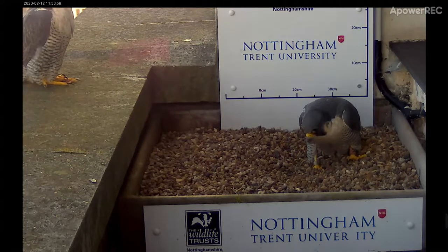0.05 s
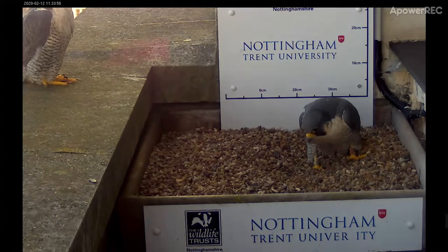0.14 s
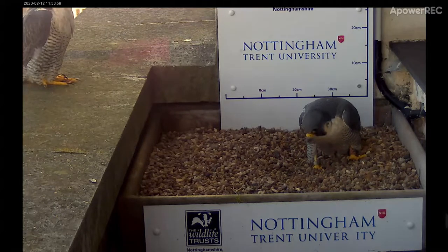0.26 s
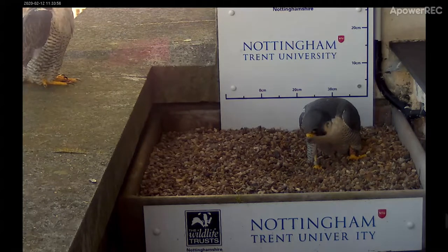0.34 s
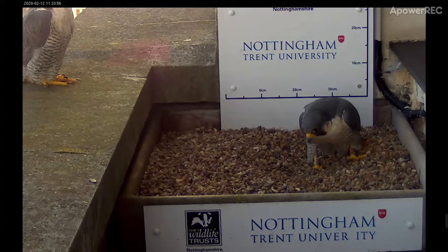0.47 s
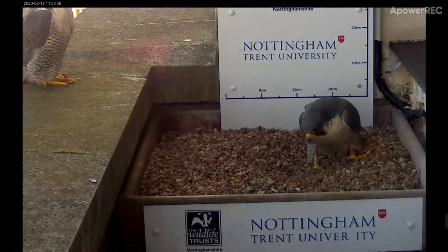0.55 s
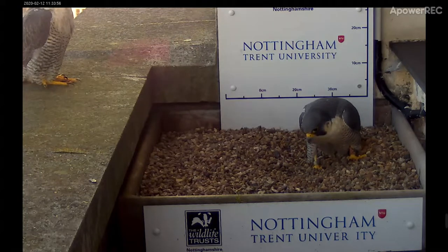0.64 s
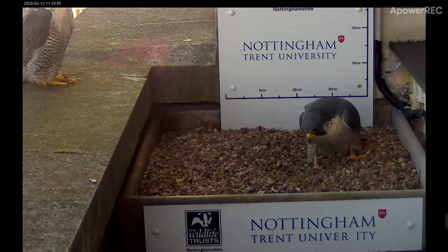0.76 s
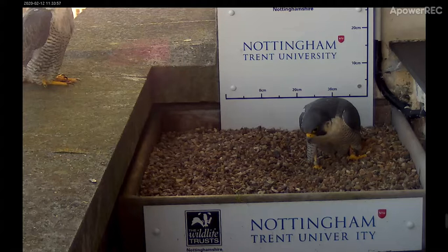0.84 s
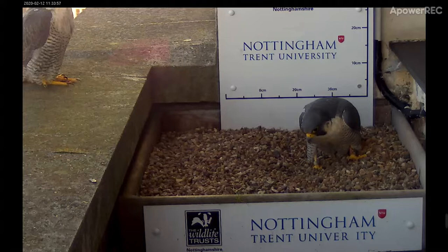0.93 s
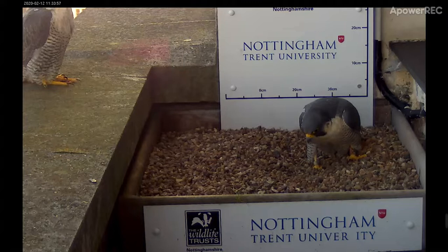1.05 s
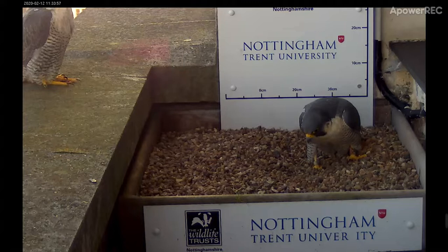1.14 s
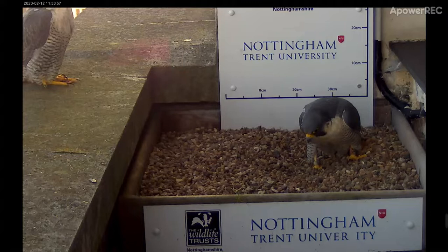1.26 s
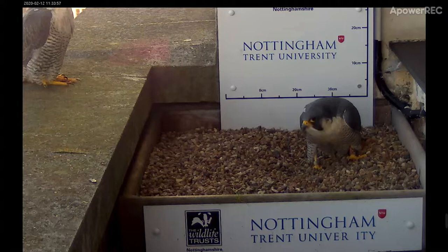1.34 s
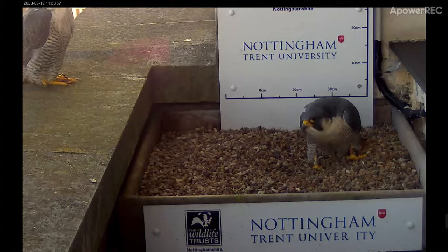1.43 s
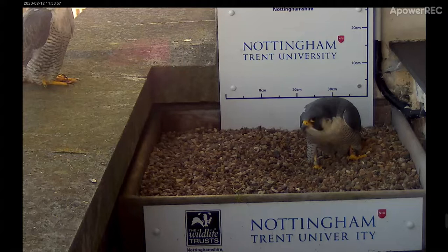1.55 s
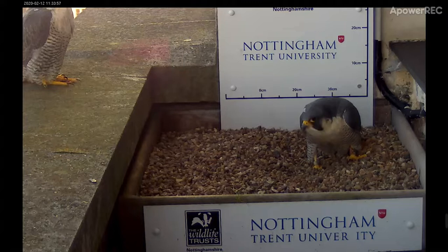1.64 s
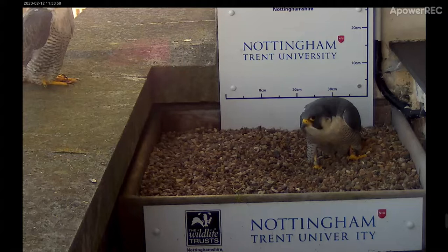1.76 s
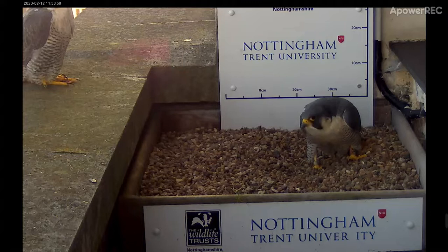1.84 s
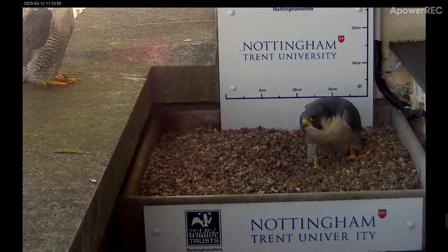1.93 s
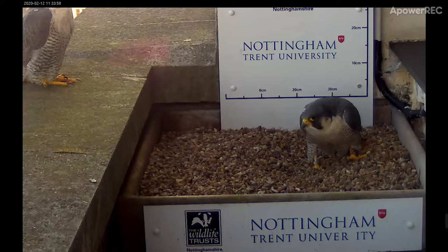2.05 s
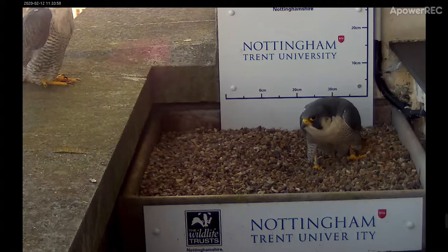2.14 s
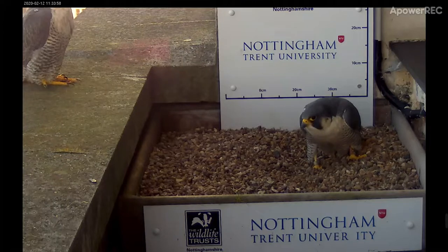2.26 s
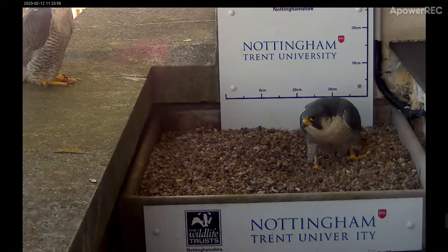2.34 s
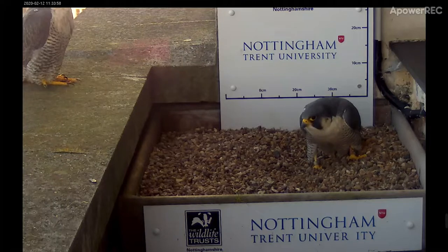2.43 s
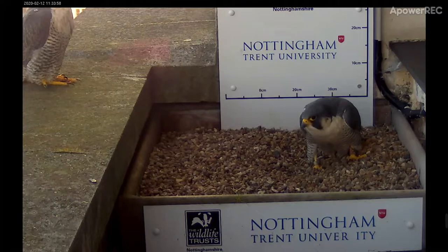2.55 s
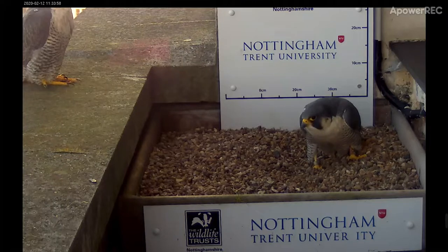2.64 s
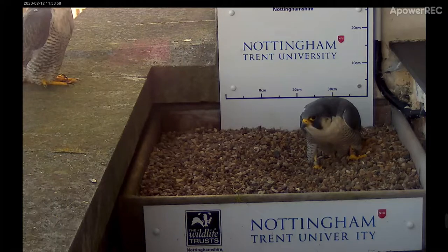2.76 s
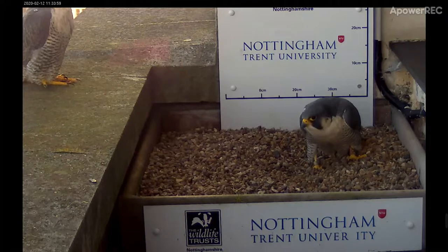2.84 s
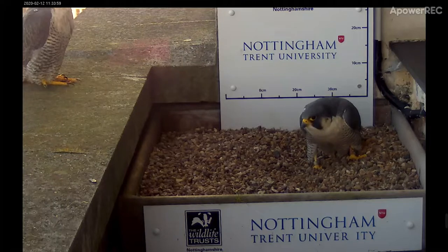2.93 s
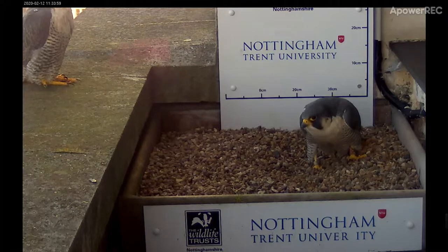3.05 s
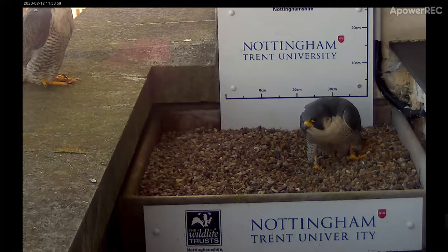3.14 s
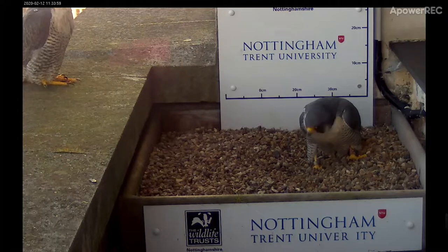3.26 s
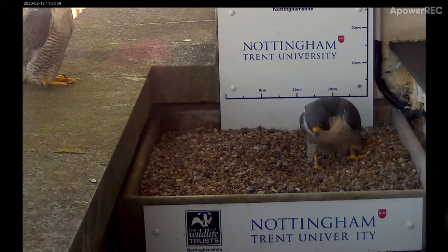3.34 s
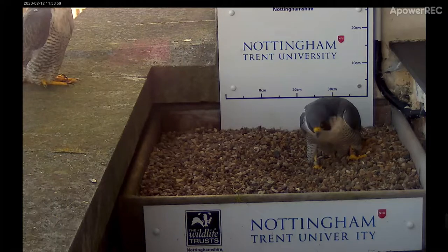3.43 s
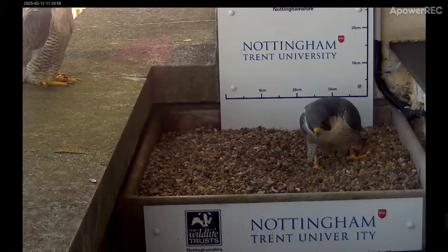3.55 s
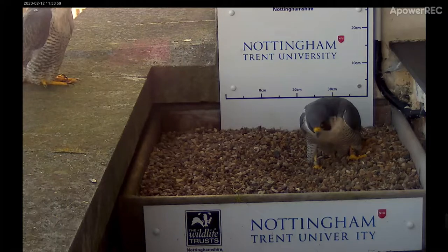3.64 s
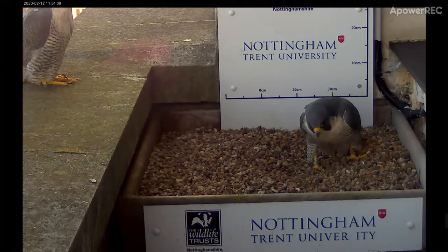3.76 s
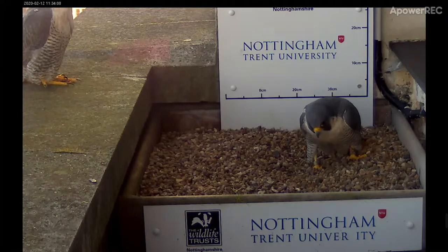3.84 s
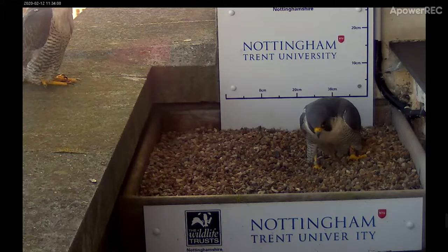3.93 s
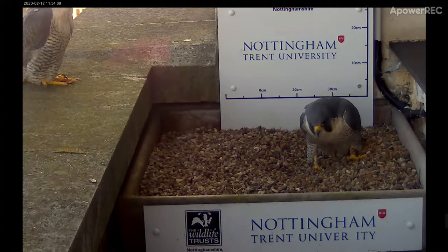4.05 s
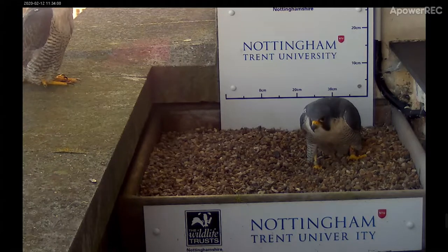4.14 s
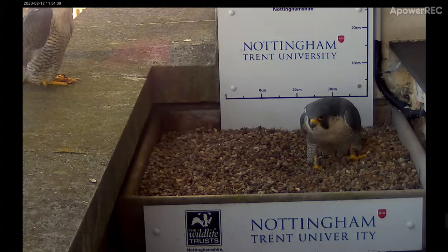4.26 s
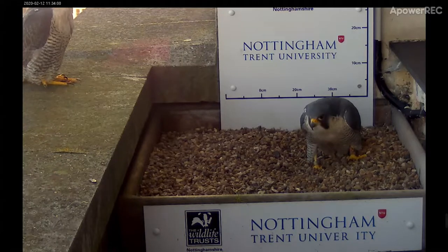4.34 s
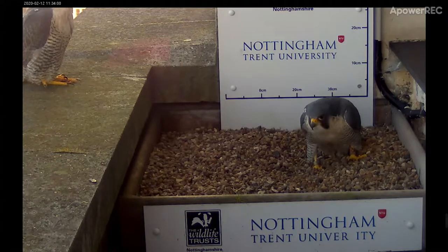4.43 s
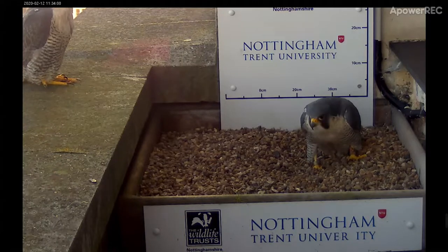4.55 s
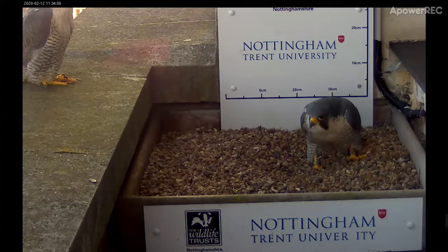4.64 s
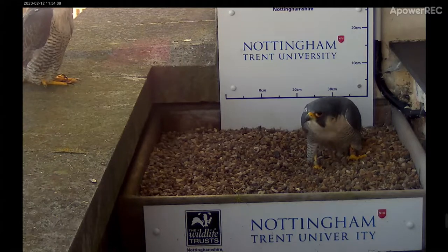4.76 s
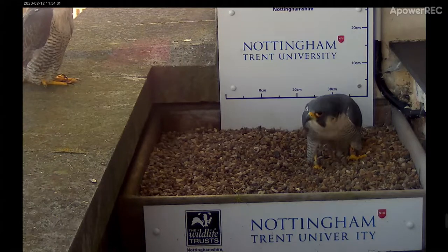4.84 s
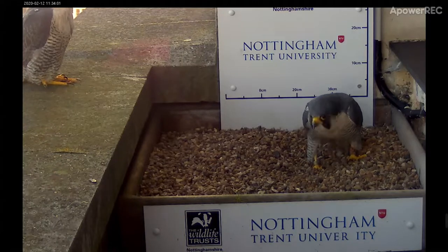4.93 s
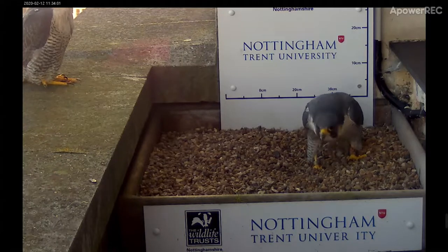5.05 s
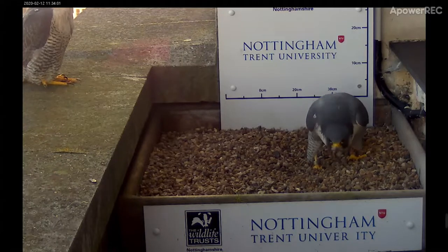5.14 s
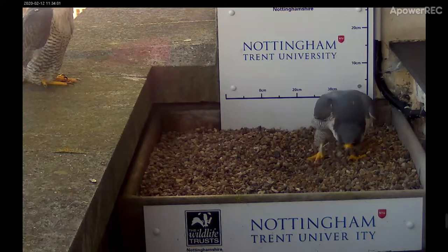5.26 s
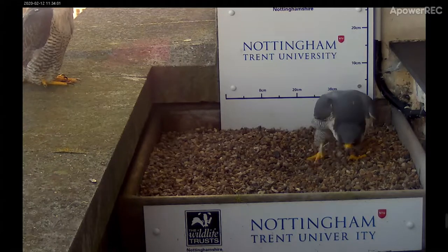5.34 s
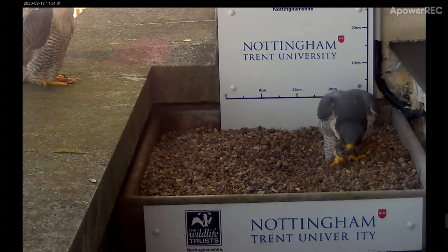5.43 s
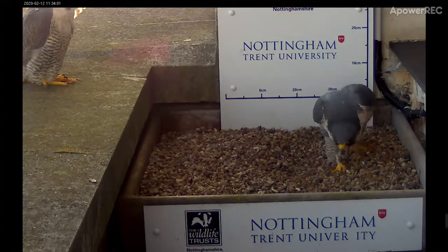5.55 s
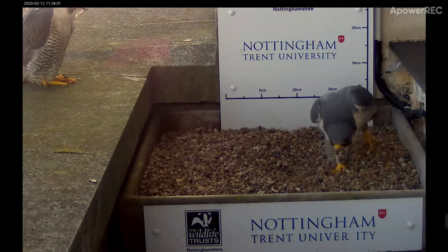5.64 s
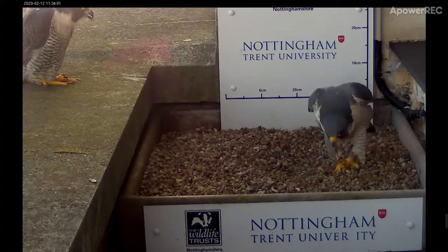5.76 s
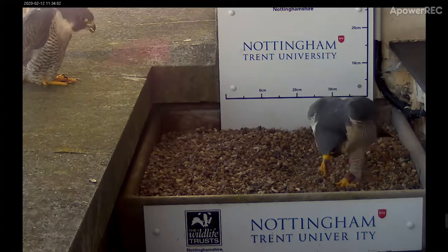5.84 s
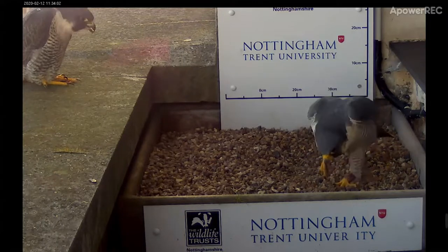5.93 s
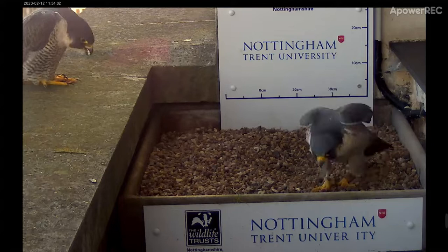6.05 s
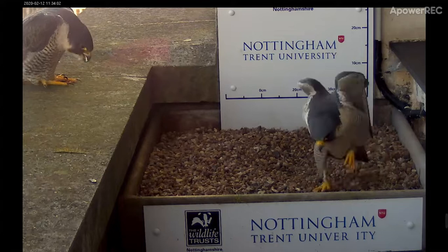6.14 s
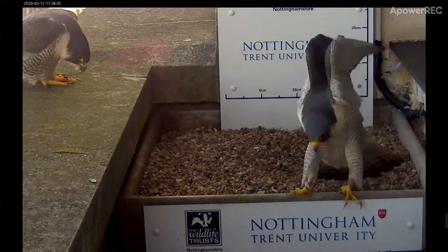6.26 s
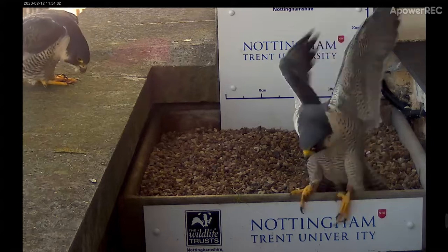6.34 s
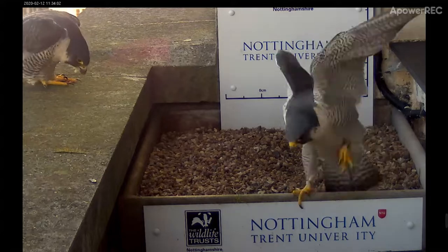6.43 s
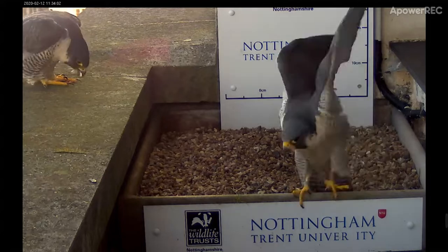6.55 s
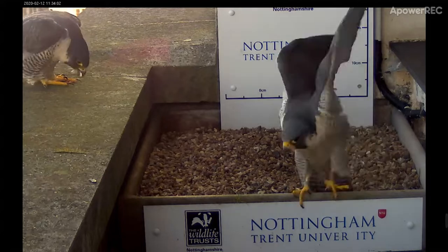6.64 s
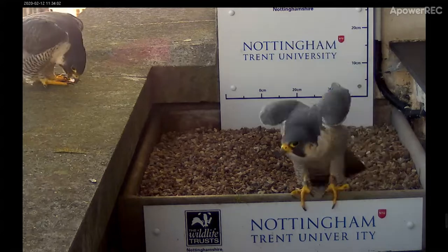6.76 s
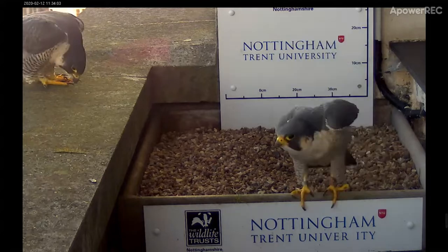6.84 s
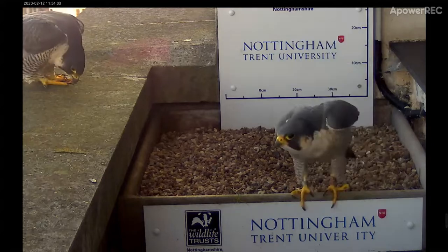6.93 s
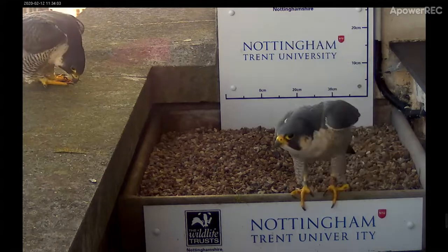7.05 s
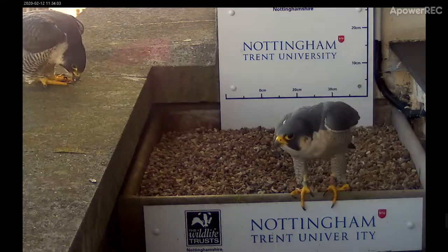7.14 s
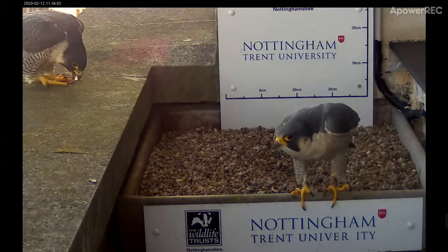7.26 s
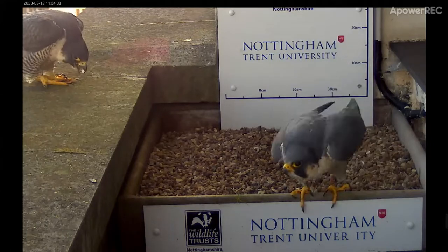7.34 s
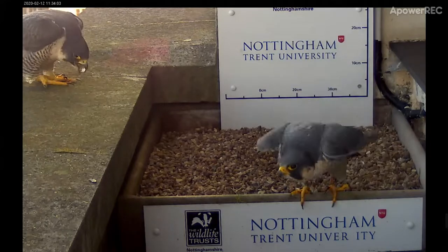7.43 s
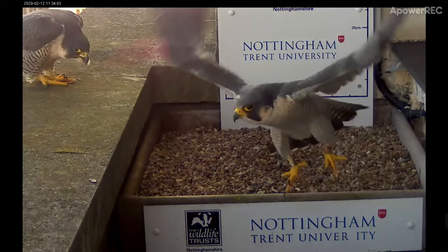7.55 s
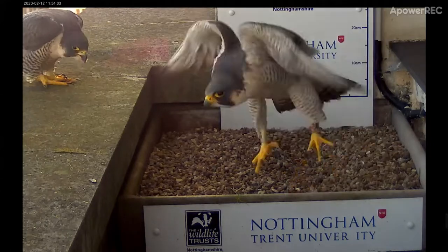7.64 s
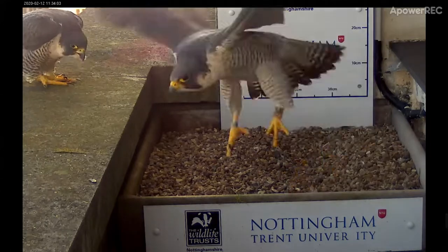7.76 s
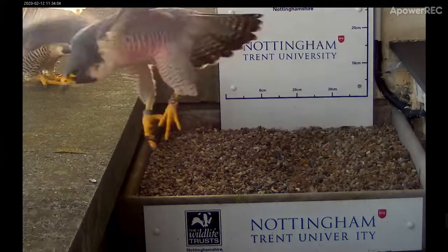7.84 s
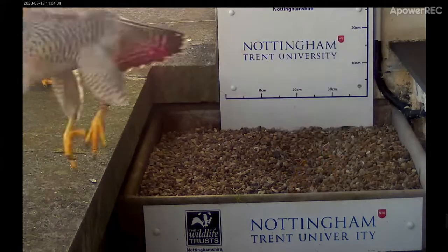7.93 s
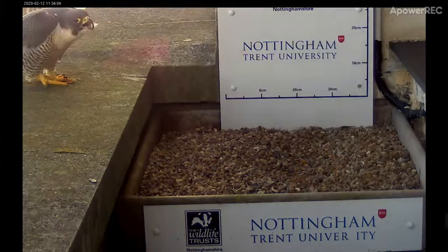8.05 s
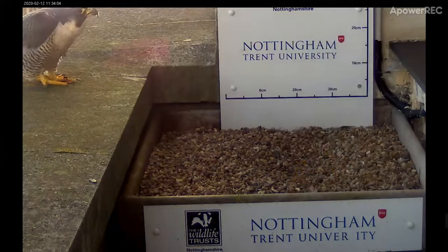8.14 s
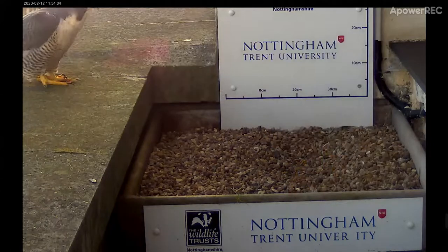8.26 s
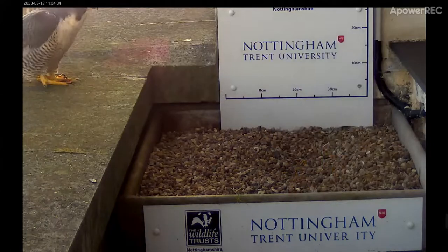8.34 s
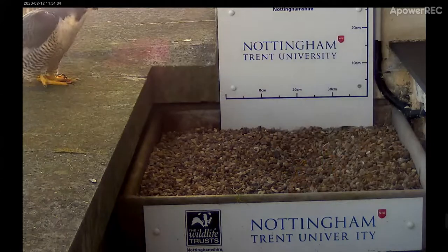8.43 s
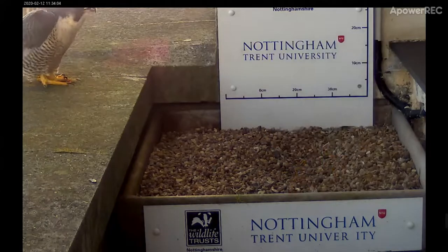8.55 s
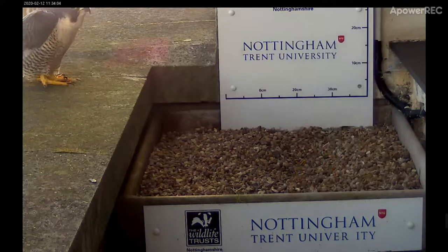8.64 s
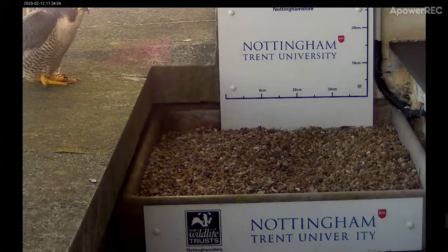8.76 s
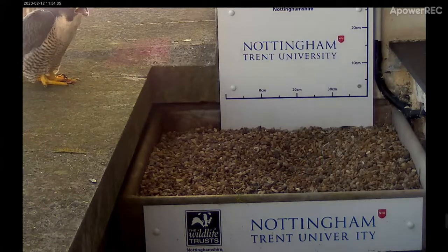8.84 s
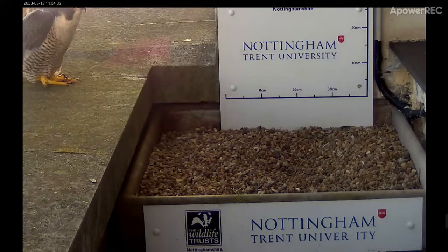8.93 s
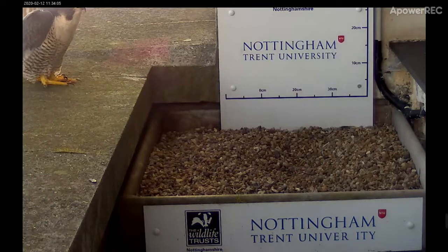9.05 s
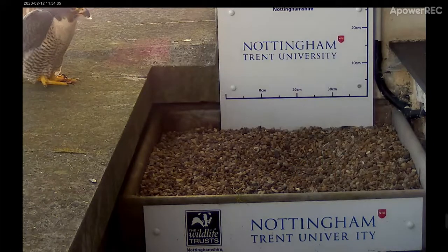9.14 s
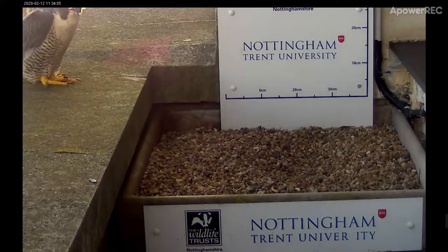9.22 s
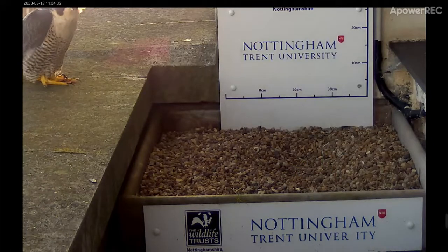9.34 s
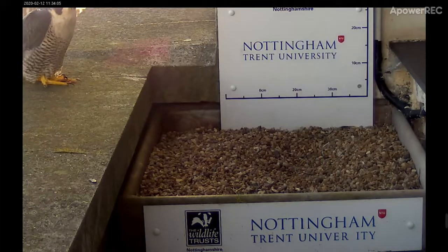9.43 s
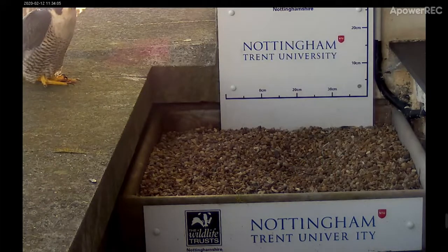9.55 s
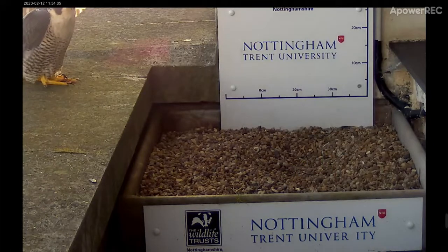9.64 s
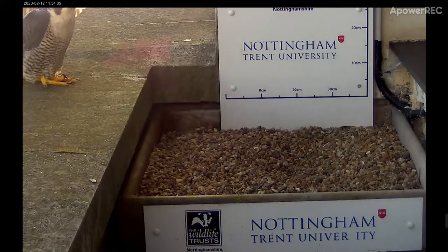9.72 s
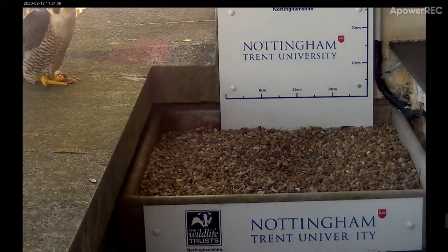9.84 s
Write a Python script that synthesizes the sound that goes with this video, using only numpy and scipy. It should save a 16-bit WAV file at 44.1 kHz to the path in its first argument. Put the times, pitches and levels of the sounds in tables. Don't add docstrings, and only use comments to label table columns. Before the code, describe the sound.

Two falcons on a stone ledge give single soft chirps, then a burst of loud wailing, snapping calls over steady low electrical hum and dull city noise.

```python
import sys
import numpy as np
from scipy import signal
from scipy.fft import rfft, irfft
from scipy.io import wavfile

SR = 44100
rng = np.random.default_rng(int(sys.argv[2]) if len(sys.argv) > 2 else 0)


def persist_wave(psi):
    counts = np.round(np.clip(psi, -1, 1) * 32767).astype(np.int16)
    wavfile.write(sys.argv[1], SR, np.atleast_2d(counts).T)


def level_to_linear(level):
    exponent = np.asarray(level, float) / 20
    return 10 ** exponent


N = 436149
T = np.arange(N) / SR


def at_hz(points, hz):
    points_hz, points_db = np.transpose(points)
    return np.interp(np.log(np.maximum(hz, 1)), np.log(points_hz), points_db)


def drift(rate_hz, size=N):
    r = np.exp(-2 * np.pi * rate_hz / SR)
    slow = signal.lfilter([1], [1, -2 * r, r * r], rng.standard_normal(size + SR))[SR:]
    return slow / np.sqrt(np.mean(slow ** 2))


# f/Hz, density/dB per Hz
CITY_SPECTRUM = [(15, -14), (30, -20.5), (60, -12), (90, -19), (200, -19), (350, -21.5), (460, -26.5),
                 (1000, -36), (1300, -31.5), (2300, -31), (3300, -37), (5000, -35.5), (7000, -39),
                 (8000, -33)]
# f/Hz, width/Hz, lift/dB
RECESS_LIFTS = [(1212, 92, 16), (1656, 24, 12.5), (1920, 40, 5), (2250, 80, 9), (2805, 250, 11.5),
                (3660, 230, 4.5), (4500, 160, 4.5)]
# t/s, length/s, level/dB
WHINE_SWELLS = [
    (.12, .2, -71),
    (3.297, 0.44, -70.5),
    (4.3, 0.51, -73.5),
    (5.1, 1.2, -67.5),
    (9.5, .5, -71),
]


def city():
    hz = np.arange(N // 2 + 1) * SR / N
    lift = 0
    for mid_hz, width_hz, db in RECESS_LIFTS:
        lift = lift + (level_to_linear(db) ** 2 - 1) / (1 + (2 * (hz - mid_hz) / width_hz) ** 2)
    shape = level_to_linear(at_hz(CITY_SPECTRUM, hz)) * np.sqrt(1 + lift)
    reference = (hz > 3200) & (hz < 7000)
    shape /= np.sqrt(np.sum(shape[reference] ** 2) / len(hz))
    noise = irfft(rfft(rng.standard_normal(N)) * shape, N)

    whine_hz = 1632 + 1.2 * drift(4)
    whine = np.sin(2 * np.pi * np.cumsum(whine_hz) / SR) * level_to_linear(2.0 * drift(10))
    swell = level_to_linear(-86)
    fade_db_per_s = 60.5
    for s, length_s, db in WHINE_SWELLS:
        outside_s = np.maximum(0, np.maximum(s - T, T - s - length_s))
        swell = swell + level_to_linear(db - fade_db_per_s * outside_s)
    return level_to_linear(-69 + .5 * drift(0.5)) * noise + 2 * swell * whine


# multiple, level/dB, flutter/dB
HUM_LINES = [(1, -72.5, -0.5), (2, -42.5, -0.27), (3, -61, -2.5), (4, -50.5, 1.06), (5, -64, 1.5),
             (6, -53, 0.57), (7, -74, 0.5), (8, -83, 2.5), (9, -73, 1.5), (10, -74, -0.4), (11, -78.5, 2),
             (12, -85.5, 2), (13, -83.5, 4), (14, -88, -2), (15, -78, 4), (18, -93.5, 3), (21, -65, 0),
             (22, -76, 5), (26, -82.5, 2), (29, -80, 2.5), (30, -80.5, 2.5), (38, -69, 1.5), (33, -78, 1.5),
             (37, -81, 1.5), (39, -72, 1.5), (47, -79, 1.5), (48, -77, 1.5), (49, -79, 1.5), (50, -78, 1.5)]


def hum():
    base_hz, trough_s = 58.392, 1.7398
    phase = 2 * np.pi * base_hz * (T - trough_s) + np.pi
    out = 0
    for k, db, flutter_db in HUM_LINES:
        above = round(k) - 2
        skew_rad = .91 * above - .28 * above ** 2
        level = level_to_linear(db + flutter_db * drift(3))
        out = out - np.sqrt(2) * level * np.cos(round(k) * phase + skew_rad)
    return out


# f/Hz, level/dB, t60/s
RECESS_MODES = [(1320, -29, 0.47), (1613, -9, 0.12), (1814, -13, 0.069), (1968, -7.5, 0.23),
                (2140, -24.5, 0.08), (2317, -16, 0.18), (2650, -16, 0.16), (2943, -9.5, 0.051),
                (3130, -19.5, 0.14), (3765, -13, 0.11), (4607, -6, 0.036), (5400, -25.5, 0.17),
                (6270, -10, 0.075), (6550, -4, 0.042)]


def recess(x, ring_db):
    t = T[:SR // 2]
    rings = 0
    for hz, db, t60_s in RECESS_MODES:
        rings = rings + level_to_linear(db + ring_db - 60 * t / t60_s) * np.sin(2 * np.pi * hz * t)
    tail_db, tail_t60_s, tail_rise_s = -7, 0.12, 0.0011
    tail = rng.standard_normal(len(t)) * level_to_linear(-60 * t / tail_t60_s) * np.minimum(t / tail_rise_s, 1)
    echo = rings + level_to_linear(tail_db) * tail / np.sqrt(np.sum(tail ** 2))
    return x + signal.fftconvolve(x, echo)[:N]


# f/Hz, width/Hz, level beak open/dB, level beak nearly shut/dB
THROAT_MODES = [(1256, 71, -7.5, 1), (1630, 66, -7, 1.5), (2223, 180, -7.5, -15.5), (2970, 255, 4, 0),
                (3704, 230, 2.5, -5.5), (4315, 350, 2, -7), (5320, 300, -3, -8.5), (6030, 230, -8, -16.5),
                (6520, 740, -8, -12.5)]


def throat(x, shut):
    out = 0.066 * x
    for k, (hz, width_hz, open_db, shut_db) in enumerate(THROAT_MODES):
        r = np.exp(-np.pi * width_hz / SR)
        poles = [1, -2 * r * np.cos(2 * np.pi * hz / SR), r * r]
        ring = signal.lfilter([1, 0, -1], poles, x + 1e-18)
        gain = level_to_linear(shut_db if shut else open_db) * (1 - r * r) / 2
        out = out + (-1) ** k * gain * ring
    return out


def pulses(pitch_hz, rough, tilt_db):
    size = len(pitch_hz)
    pitch_hz = pitch_hz * (1 + .1 * rough * drift(400, size=size))
    phase = 2 * np.pi * np.cumsum(pitch_hz) / SR
    stack = 0
    for k in range(1, 19):
        level = level_to_linear(tilt_db * np.log2(k * pitch_hz / 3000))
        stack = stack + level * np.cos(k * phase) * (k * pitch_hz < 8000)
    puffs = rng.standard_normal(size) * (1 + np.cos(phase)) * np.std(stack)
    uneven = level_to_linear(5 * rough * drift(300, size=size))
    voice = stack * uneven + .6 * rough * puffs
    return voice / np.sqrt(np.mean(voice ** 2))


# t/s, level/dB, pulse rate/Hz, length/s, roughness/0-1
ONSETS = [
    (1.849, -52, 910, .012, 0.1),
    (5.79, -51, 940, 0.015, 0.3),
    (6.769, -36, 576, 0.029, 0.5),
    (7.419, -32, 600, 0.031, 0.56),
    (8.025, -33, 611, 0.046, 0.55),
    (8.696, -35, 455.6, 0.054, 0.42),
]
BREAKS = [
    (6.585, -56.5, 721, 0.026, 0.96),
    (6.902, -49.5, 772, 0.036, 0.3),
    (7.572, -51.5, 804, 0.047, 0.3),
    (8.151, -46.5, 798, 0.047, .7),
    (8.045, -43.5, 900, .02, .3),
    (9.014, -39, 800, 0.029, 0.3),
    (9.451, -47, 796, 0.023, 0.5),
]


def rasps():
    out = np.zeros(N)
    for rows, mouth_hz in [(ONSETS, 2570), (BREAKS, 4700)]:
        mouth = signal.butter(2, [0.6 * mouth_hz, 1.53 * mouth_hz], "band", fs=SR, output="sos")
        for s, db, rate_hz, length_s, rough in rows:
            u = np.arange(int(length_s * SR)) / (length_s * SR)
            effort = np.minimum(u / 0.23, 1) * (1 - u) ** .5
            voice = pulses(rate_hz * (1.1 - .2 * u), rough, tilt_db=3.5)
            start = int(s * SR)
            out[start:start + len(u)] += level_to_linear(db + 9.5) * effort * signal.sosfilt(mouth, voice)
    return out


# t/s, level/dB, first hold f/Hz, second hold f/Hz, length/s
CHUP_EVENTS = [
    (6.38, -40.5, 3520, 2723, 0.023),
    (7.012, -25.5, 3147, 2128, 0.03),
    (7.713, -18, 3162, 2255, 0.027),
    (8.265, -18, 3074, 2208, .04),
    (9.046, -37, 2950, 1980, .064),
    (9.482, -29.5, 3133, 2070, 0.036),
]


def chups():
    out = np.zeros(N)
    for s, db, first_hz, second_hz, length_s in CHUP_EVENTS:
        first_db = 210 * (length_s - 0.028)
        u = np.arange(int(length_s * SR)) / (length_s * SR)
        first = np.interp(u, [0, .08, .2, .38], [1.45, 1.2, 1.0, .97]) * first_hz
        second = np.interp(u, [.38, .64, .8, 1], [1.02, .98, .72, .5]) * second_hz
        effort_db = np.interp(u, [0, .05, .17, .26, .36, .41, .62, .72, 1],
                              [-35, -12, -10, first_db, first_db, 0, -3, -10, -20])
        rough = 0.18 + .5 * u ** 2
        voice = pulses(np.where(u < .38, first, second), rough, tilt_db=0)
        start = int(s * SR)
        out[start:start + len(u)] += level_to_linear(db) * level_to_linear(effort_db) * voice
    return out


def whistles(tables, wobble, flutter_db, edge_s, half_db, haze_db):
    out, breath = np.zeros(N), np.zeros(N)
    for rows in tables:
        s, pitch_hz, *levels_db = np.transpose(rows)
        span = slice(int(s[0] * SR), int(s[-1] * SR))
        t = T[span]
        unsteady_hz = np.interp(t, s, pitch_hz) * (1 + wobble * drift(140, size=len(t)))
        phase = 2 * np.pi * np.cumsum(unsteady_hz) / SR
        edge = np.clip(np.minimum(t - s[0], s[-1] - t) / edge_s, 0, 1)
        uneven = 1 + level_to_linear(half_db + 3.1 * drift(40, size=len(t))) * np.cos(phase / 2)
        for k, db in enumerate(levels_db):
            gain = edge * level_to_linear(np.interp(t, s, db) + flutter_db * drift(95, size=len(t)))
            out[span] += np.sqrt(2) * gain * uneven * np.sin((k + 1) * phase)
            breath[span] += gain
    return out + level_to_linear(haze_db) * throat(breath * rng.standard_normal(N), shut=False)


def glides(rows, swell):
    u, swell_db = np.transpose(swell)
    out = []
    for s, length_s, db, from_hz, to_hz in rows:
        out.append(np.transpose([s + u * length_s, from_hz + u * (to_hz - from_hz), db + swell_db]))
    return out


# t/s, length/s, level/dB, from f/Hz, to f/Hz
SQUEAL_BURSTS = [
    (.15, .2, -66, 4110, 4100),
    (.39, .21, -66.5, 4100, 4090),
    (.63, .34, -66, 4035, 4005),
    (1.01, .25, -69, 4015, 4025),
]
# share of length, level/dB
SQUEAL_ENVELOPE = [(0, -8), (.1, -3), (.7, 0), (1, -6)]


def squeals():
    return glides(SQUEAL_BURSTS, SQUEAL_ENVELOPE)


# t/s, length/s, level/dB, from f/Hz, to f/Hz
PIPE_LINES = [(6.955, 0.073, -39.5, 5030, 5340), (8.196, .045, -43, 4400, 4440),
              (8.699, .022, -34, 3000, 2860), (8.718, 0.042, -33, 2810, 2700),
              (9.464, 0.018, -34.5, 5400, 5290), (9.049, .017, -34, 4720, 3300),
              (9.068, .028, -47, 1970, 1900), (6.772, .03, -41, 1620, 1590), (8.708, .047, -42, 1620, 1615),
              (6.386, 0.018, -41, 5300, 5240), (7.425, 0.027, -44.5, 1800, 1700),
              (8.715, .025, -46, 5250, 5150), (8.703, .08, -46, 1235, 1225), (7.434, .04, -47, 1290, 1270),
              (5.795, .018, -50, 2800, 2780), (6.27, .024, -48, 5150, 5400), (6.222, .025, -50, 5450, 5150),
              (6.773, .014, -40, 2880, 2820), (6.773, .013, -44, 3680, 3620), (7.422, .03, -38, 2950, 2750),
              (9.064, .02, -36, 2950, 2760), (5.795, .03, -53, 3800, 4000), (5.853, .016, -53, 3780, 3600),
              (6.185, .065, -57, 1850, 1820)]
# share of length, level/dB
PIPE_ENVELOPE = [(0, -13), (.35, 0), (.7, -2), (1, -13)]


def pipes():
    return glides(PIPE_LINES, PIPE_ENVELOPE)


# f/Hz, level/dB
WINDPIPE_COLOUR = [(1850, -19), (2050, -8), (2400, -0.5), (4600, 0), (5400, -6), (6300, -5.5), (7300, -12),
                   (8000, -45.5)]


def sung(s, pitch_hz, effort_db, partials_db):
    t = np.union1d(s, np.linspace(s[0], s[-1], num=12))
    pitch_hz, effort_db = np.interp(t, s, pitch_hz), np.interp(t, s, effort_db)
    columns = [t, pitch_hz]
    for k, db in enumerate(partials_db):
        columns.append(effort_db + db + at_hz(WINDPIPE_COLOUR, (k + 1) * pitch_hz))
    return np.transpose(columns)


# t/s, length/s, level/dB, top f/Hz, final sag/Hz
CHIRP_EVENTS = [
    (1.85, 0.068, -31.5, 2070, 190),
    (2.158, .068, -44, 1890, 150),
    (5.793, 0.088, -50, 2090, 70),
    (5.977, .1, -49, 1820, 70),
    (6.171, .075, -49, 1865, 120),
    (6.298, .105, -51.5, 3170, 50),
]
# share of length, scoop/share of top, share of sag, effort/dB
CHIRP_COURSE = [(0, .94, 0, -22), (.08, .97, 0.0088, -6), (.3, 1.0, 0, 0), (.52, 1.0, .08, -2),
                (.62, 1.0, .55, -7), (.9, 1.0, .95, -9.5), (1, 1.0, 1, -21)]
CHIRP_PARTIALS = [6, 0, 3.5, -1.5]


def chirps():
    u, scoop, sag, effort_db = np.transpose(CHIRP_COURSE)
    soft_db = -50
    follows = np.array([.15, 1, .6, .4])
    out = []
    for s, length_s, db, top_hz, sag_hz in CHIRP_EVENTS:
        partials_db = CHIRP_PARTIALS + (db - soft_db) * follows
        out.append(sung(s + u * length_s, scoop * top_hz - sag * sag_hz, soft_db + effort_db, partials_db))
    return out


# t/s, length/s, level/dB, share of length to loudest, f there/Hz
CLIMB_EVENTS = [
    (6.913, .066, -32.5, .55, 1813),
    (7.579, 0.091, -36.5, .17, 1840),
    (8.161, 0.078, -32, .3, 1798),
    (9.015, .037, -29, 0.42, 1792),
    (9.447, 0.032, -25, .45, 1845),
    (7.673, 0.024, -40, 0.48, 2220),
]


def climbs():
    out = []
    for s, length_s, db, peak, hz in CLIMB_EVENTS:
        t = length_s * np.array([0, .35 * peak, peak, .8, 1])
        ceiling_hz = hz * np.array([1, 1, 1, 1.03, 1.03])
        pitch_hz = np.minimum(hz + 270 * (t / length_s - peak), ceiling_hz)
        effort_db = db + np.array([-33, -9.5, 0, -12, -27])
        out.append(sung(s + t, pitch_hz, effort_db, [-25.5, 0, -18, -6.5]))
    return out


# t/s, level/dB, fall/s, lowest f/Hz, rise/s
WAIL_EVENTS = [
    (6.792, -19.5, .082, 1930, .04),
    (7.445, -18.5, 0.07, 1830, 0.068),
    (8.064, -15, .062, 1847, .036),
]


def wails():
    top_hz, end_hz, attack_s = 2400, 2150, .008
    loss_db_per_hz, usual_hz_per_s = .06, 7500
    out = []
    for s, db, fall_s, low_hz, rise_s in WAIL_EVENTS:
        end_s = fall_s + rise_s
        t = np.array([0, attack_s, .55 * fall_s, .88 * fall_s, fall_s,
                      fall_s + .2 * rise_s, fall_s + .85 * rise_s, end_s])
        pitch_hz = np.interp(t, [attack_s, .8 * fall_s, fall_s, end_s],
                             [top_hz, 1.04 * low_hz, low_hz, end_hz])
        haste = (top_hz - low_hz) / fall_s / usual_hz_per_s
        loss_db = haste * loss_db_per_hz * (pitch_hz[:5] - top_hz)
        falling_db = db + (loss_db + [-28, 0, 1.5, 0, -3])
        rising_db = -41 + np.array([9 * (1 - haste ** 2) - 2.5, 0, -9])
        out.append(sung(s + t, pitch_hz, np.append(falling_db, rising_db), [-.8, 0, -15, -30]))
    return out


def scene():
    lines = whistles(squeals() + pipes(), wobble=.003, flutter_db=2.6, edge_s=.004, half_db=-60, haze_db=-24)
    notes = whistles(chirps() + climbs() + wails(),
                     wobble=.004, flutter_db=2.7, edge_s=.002, half_db=-27, haze_db=-19.5)
    song = level_to_linear(-1.2) * (lines + notes)
    cries = level_to_linear(4) * (throat(chups(), shut=False) + throat(rasps(), shut=True))
    return (recess(song, ring_db=-46) + recess(cries, ring_db=-30.5) + hum() + city())[None]


def roll_off(x):
    return signal.sosfilt(signal.butter(12, 16000, fs=SR, output="sos"), x)


def record(dry):
    cutoff_hz, ceiling = 7230, 2.8
    start_s, drop_s, drop_len_s = .1197, 1.7393, .0013
    x = signal.sosfilt(signal.cheby2(10, 60, cutoff_hz * 1.191, fs=SR, output="sos"), dry)
    x = ceiling * np.tanh(x / ceiling)
    late = np.arange(N) - round(drop_len_s * SR) * (T < drop_s)
    x = x[:, np.maximum(late, 0)] * (T > start_s)
    return roll_off(x)


dry = scene()
out = record(dry)
persist_wave(out)
```